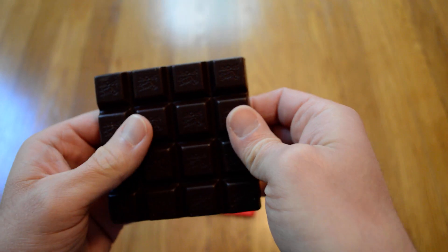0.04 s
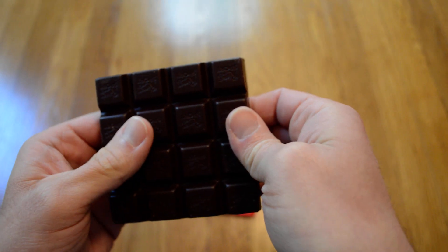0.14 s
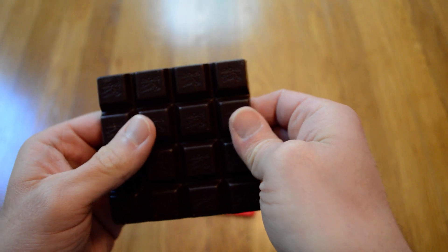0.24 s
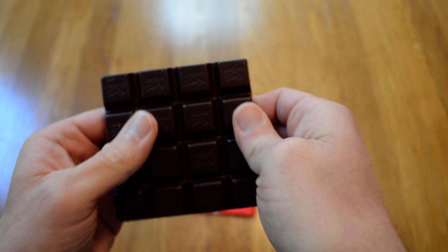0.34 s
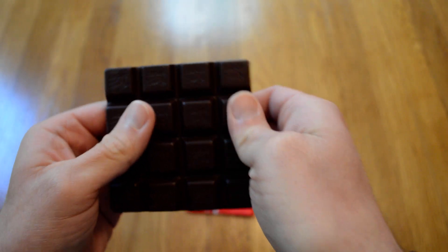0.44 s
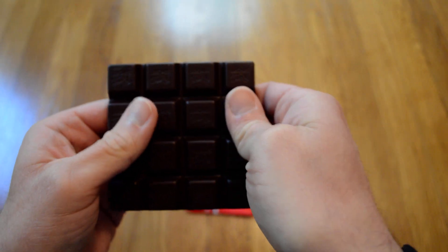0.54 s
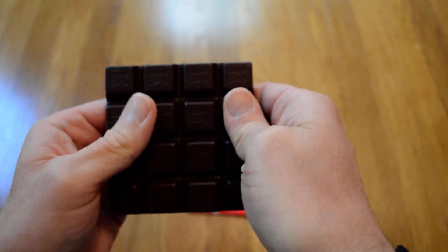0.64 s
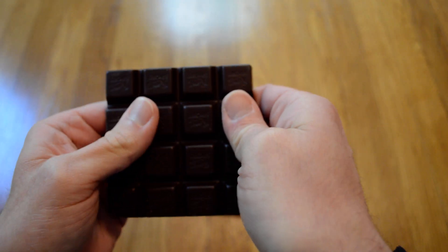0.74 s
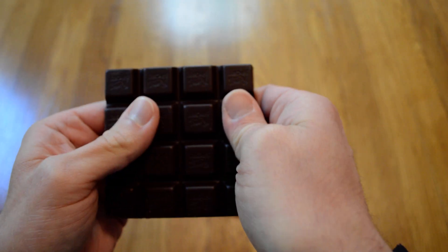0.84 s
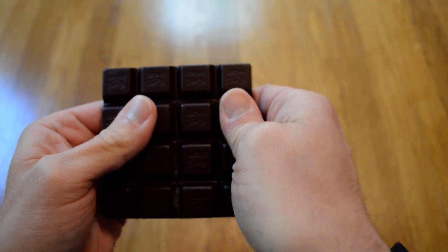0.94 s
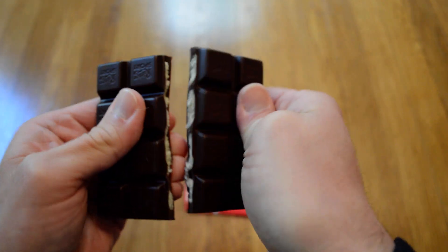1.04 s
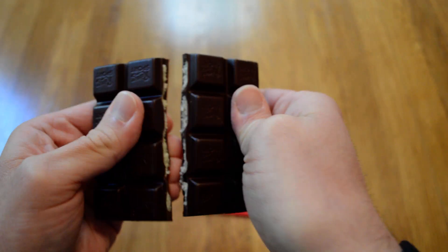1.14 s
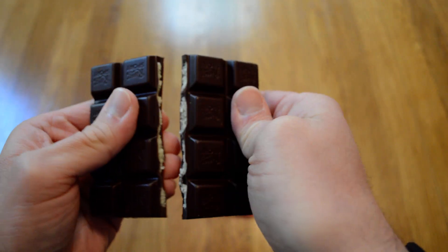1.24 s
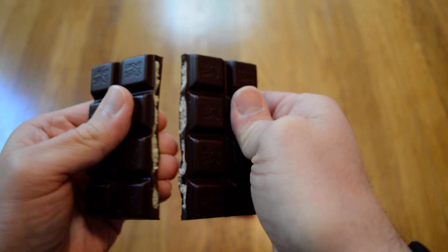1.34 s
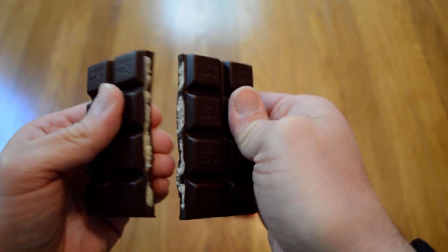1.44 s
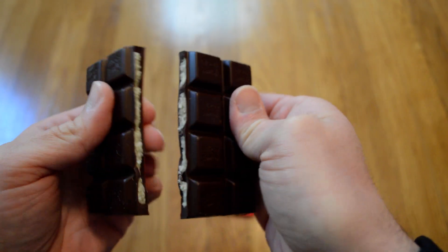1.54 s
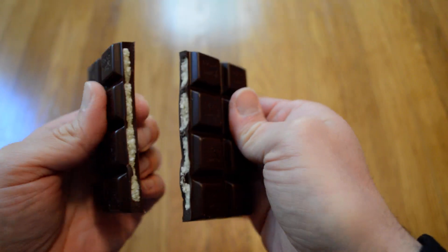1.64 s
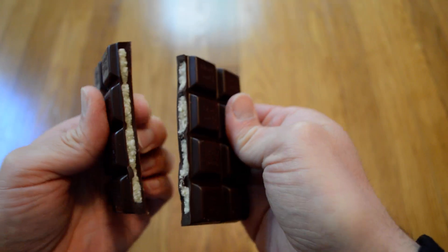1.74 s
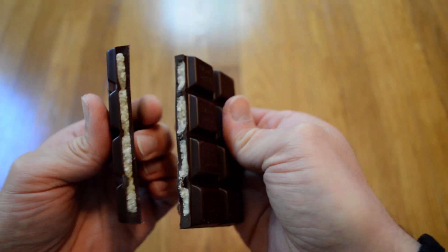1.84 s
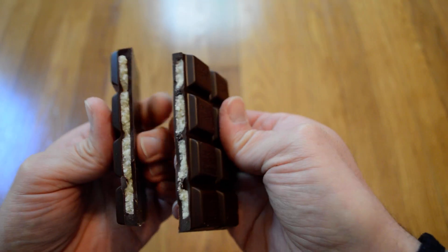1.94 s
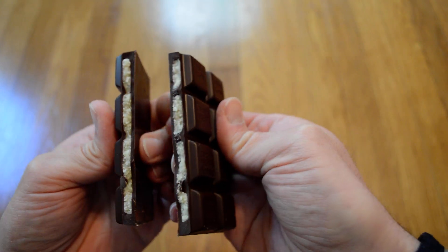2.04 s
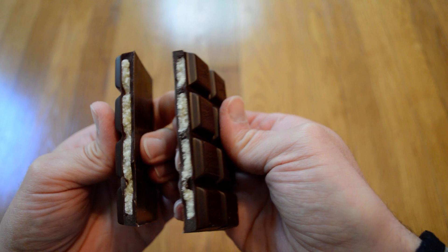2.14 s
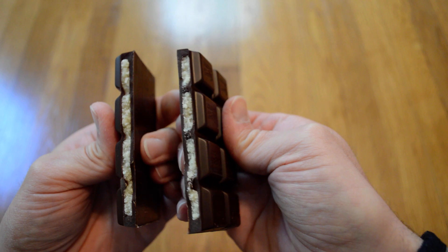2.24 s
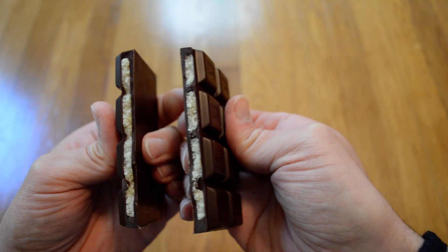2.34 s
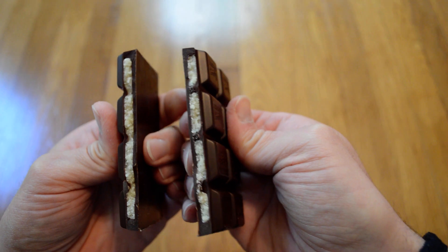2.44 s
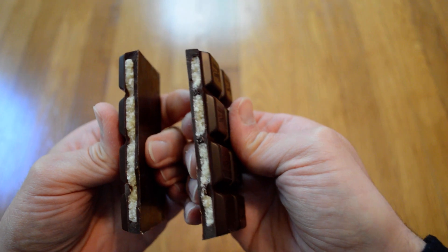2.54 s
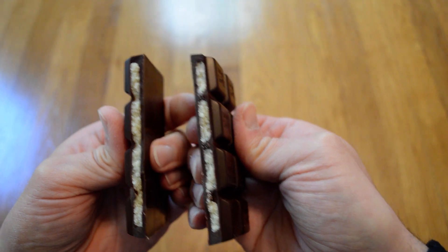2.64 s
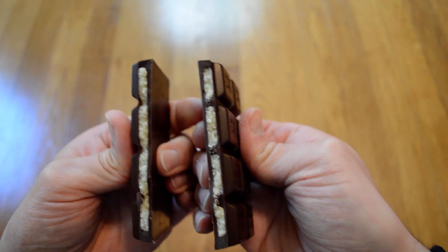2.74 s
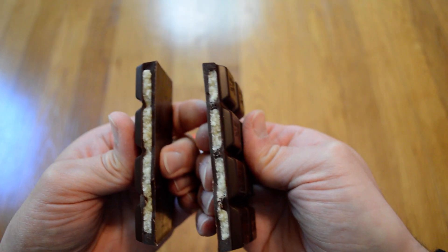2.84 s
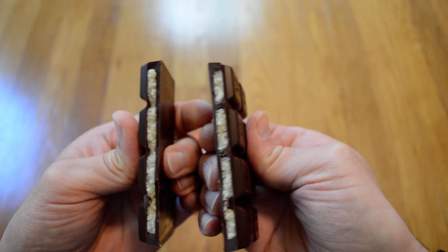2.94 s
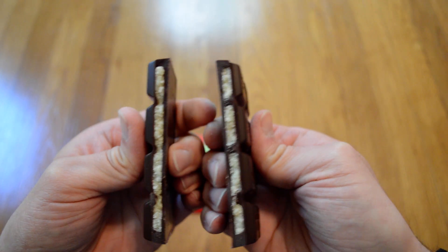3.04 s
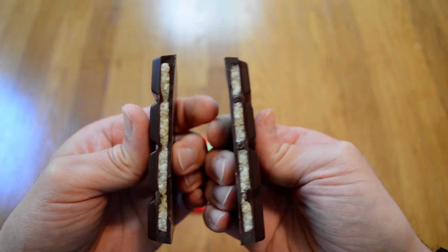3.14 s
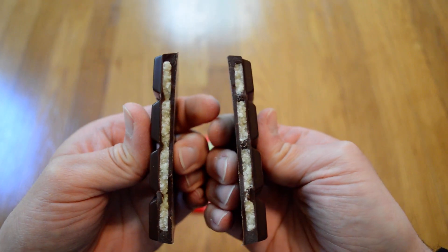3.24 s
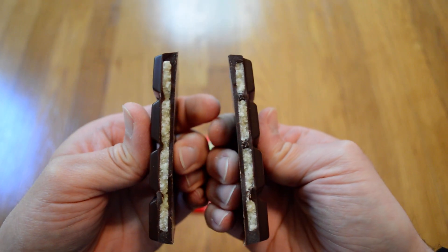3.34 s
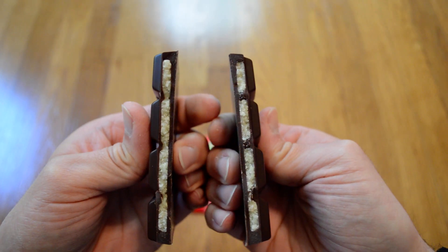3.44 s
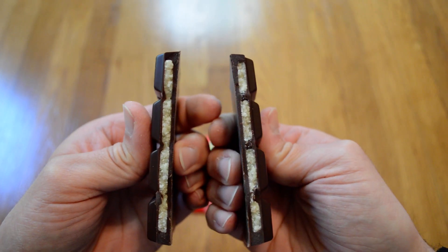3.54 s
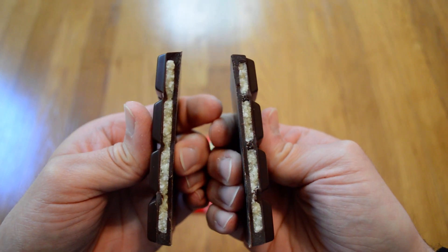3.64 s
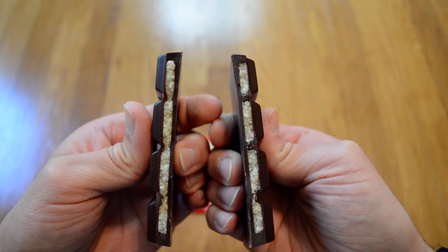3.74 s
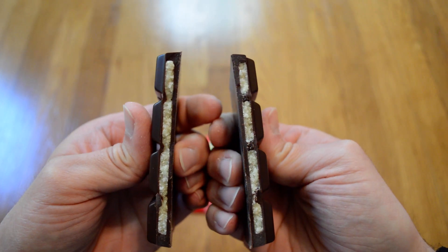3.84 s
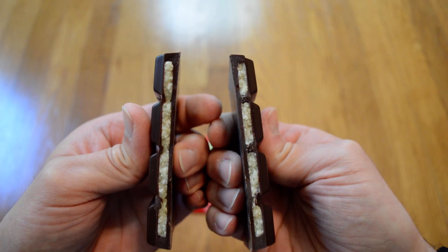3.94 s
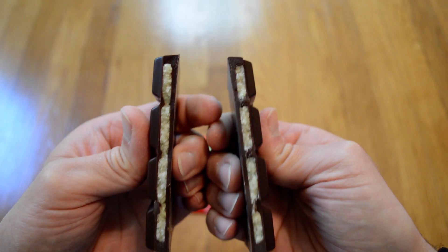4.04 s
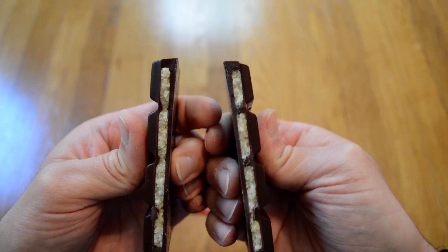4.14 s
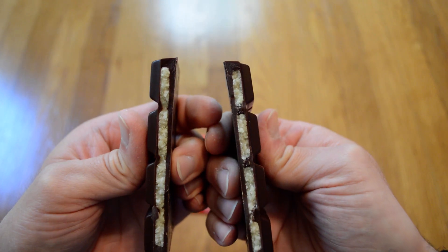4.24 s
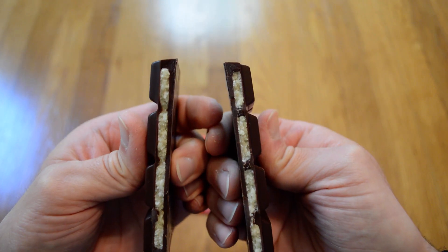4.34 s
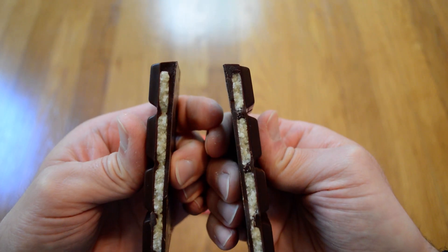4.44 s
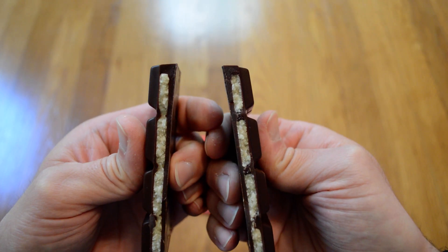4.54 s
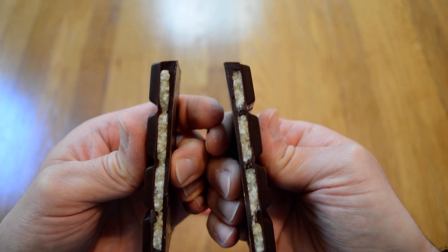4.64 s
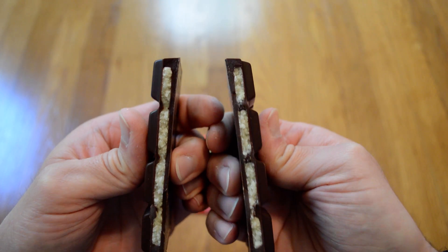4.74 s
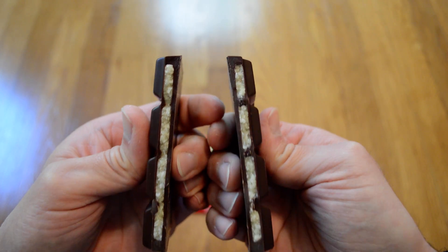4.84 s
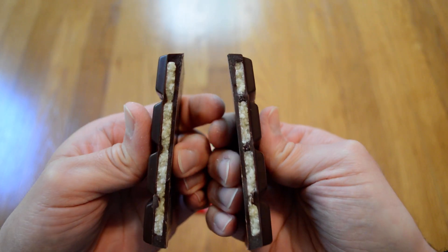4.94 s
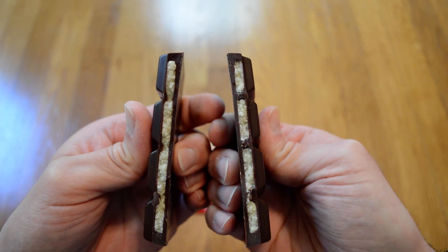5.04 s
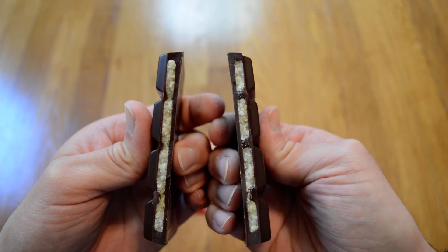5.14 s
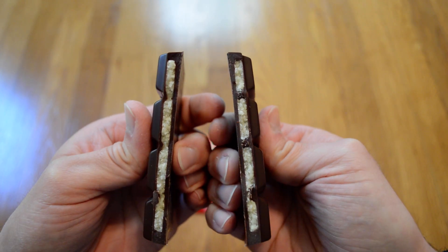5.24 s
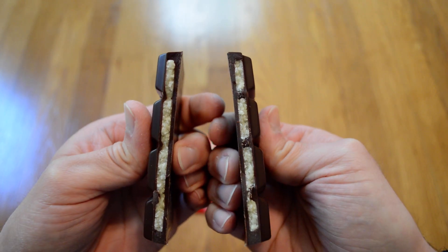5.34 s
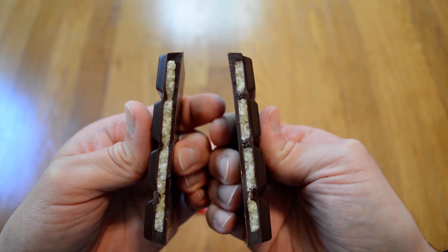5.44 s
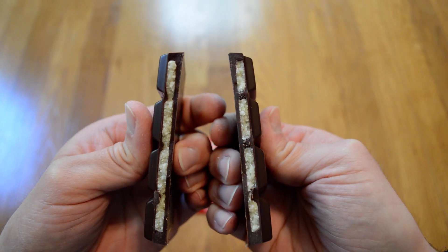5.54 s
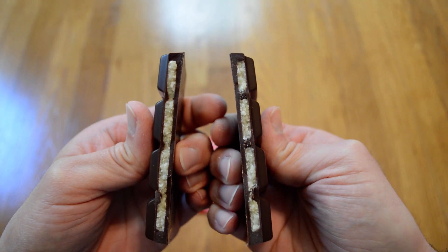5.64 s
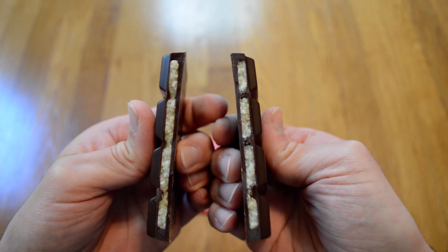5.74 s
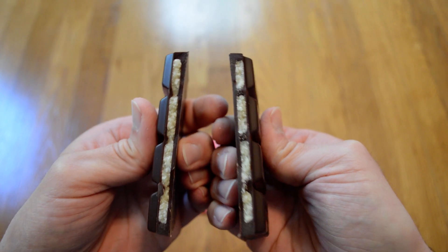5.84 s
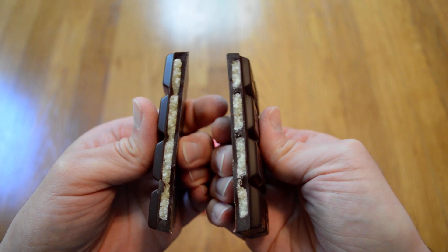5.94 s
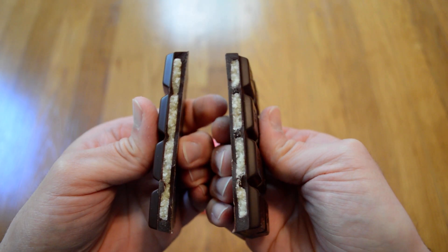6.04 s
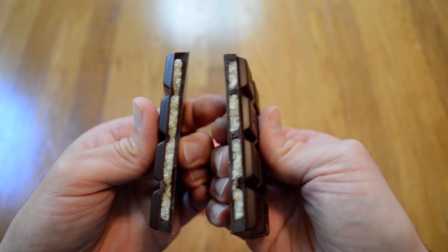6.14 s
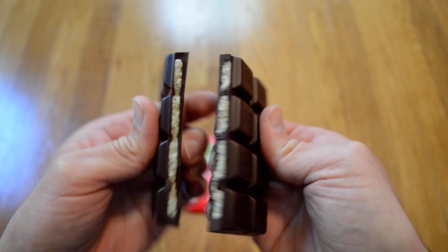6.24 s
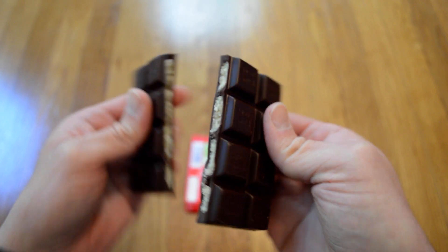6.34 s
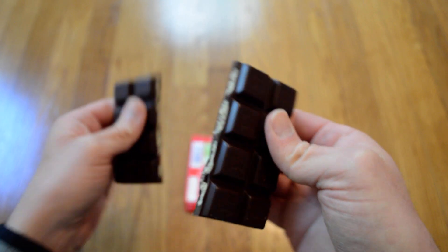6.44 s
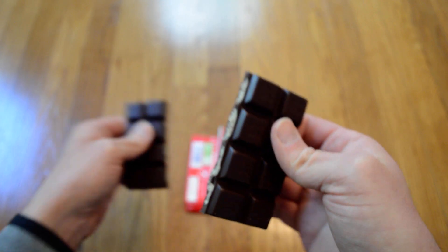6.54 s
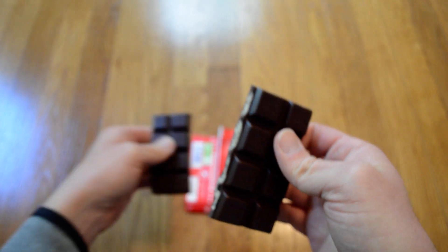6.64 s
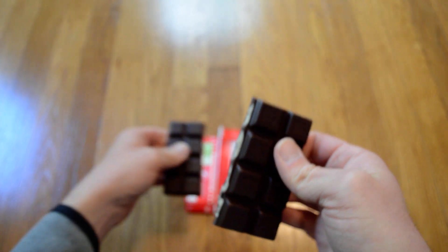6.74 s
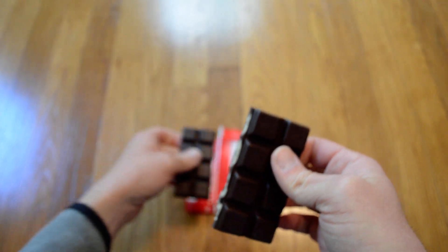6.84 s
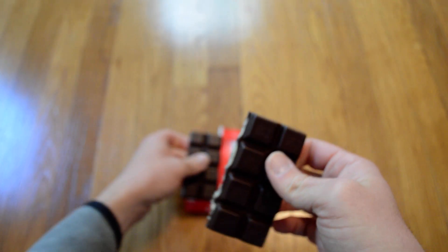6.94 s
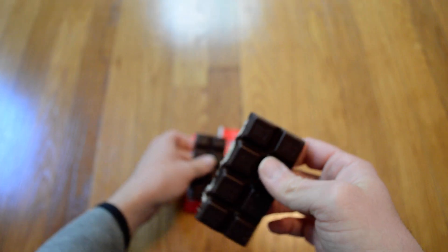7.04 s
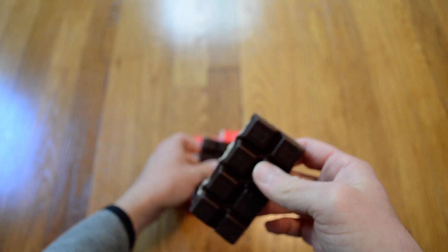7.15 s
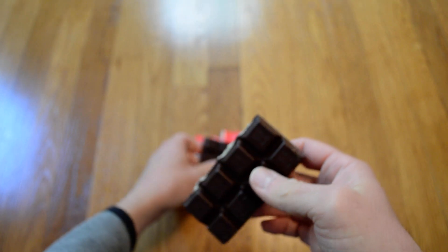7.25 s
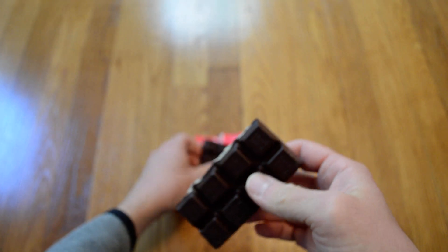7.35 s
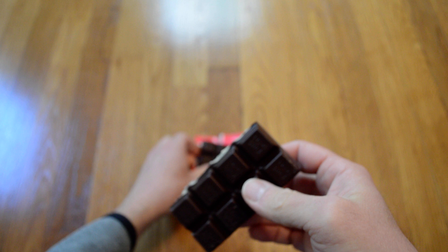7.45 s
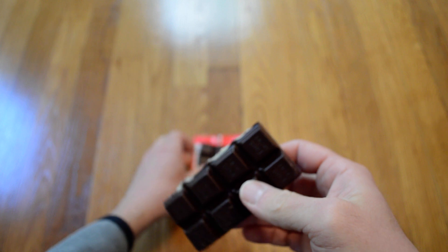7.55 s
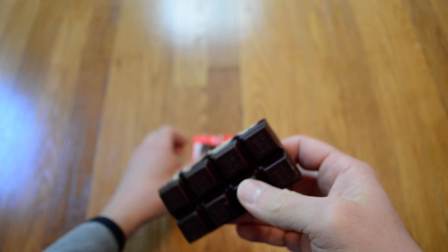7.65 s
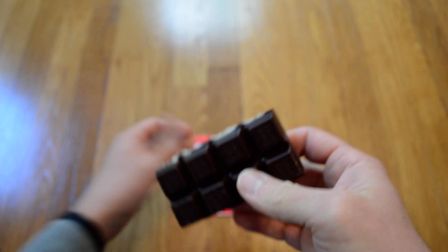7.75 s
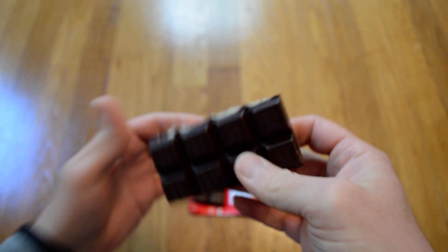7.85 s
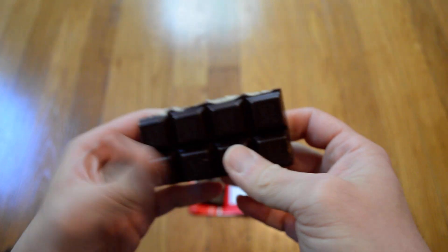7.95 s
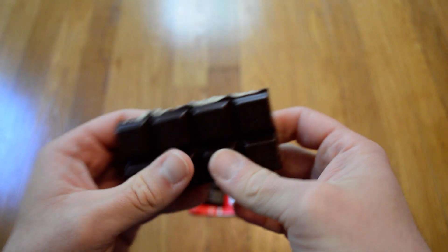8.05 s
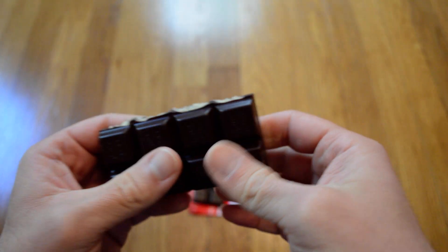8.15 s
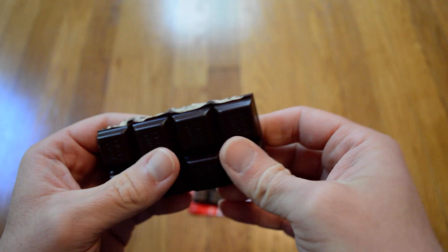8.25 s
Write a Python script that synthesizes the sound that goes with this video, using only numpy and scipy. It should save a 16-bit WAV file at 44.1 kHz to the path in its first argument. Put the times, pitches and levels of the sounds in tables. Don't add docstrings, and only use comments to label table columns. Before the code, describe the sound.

Indoors, close microphone: faint uneven mechanical ticking and hum run throughout. About a second in, chocolate creaks and breaks with a bright, very short crack that rings briefly off hard walls. A barely audible fingertip touch follows, then several seconds of only motor rattle. Late on, cloth rustles as an arm reaches away, a piece knocks onto foil and floorboards, the wrapper crinkles and scrapes, and brushing fades.

```python
import sys
import numpy as np
from scipy import signal
from scipy.fft import rfft, irfft
from scipy.io import wavfile
from scipy.ndimage import uniform_filter1d

SR = 44100
rng = np.random.default_rng(int(sys.argv[2]) if len(sys.argv) > 2 else 0)


def rack_gain(trim_db):
    fader = np.asarray(trim_db, float)
    return 10 ** (fader / 20)


def digitize_waveform(pressure):
    field = np.atleast_2d(pressure).T
    bounded = np.clip(field, -1, 1)
    quanta = np.round(bounded * 32767).astype(np.int16)
    wavfile.write(sys.argv[1], SR, quanta)


N = 366471
T = np.arange(N) / SR


def level(x, db):
    return x * rack_gain(db) / np.sqrt(np.mean(x ** 2))


def band(x, hz, width_hz):
    return signal.lfilter(*signal.iirpeak(hz, hz / width_hz, fs=SR), x)


def band_twice(x, hz, width_hz):
    return band(band(x, hz, width_hz), hz, width_hz)


def split(x, hz, kind):
    return signal.sosfilt(signal.butter(4, hz, kind, fs=SR, output="sos"), x)


def ring(x, modes):
    t = T[:len(x)]
    body = sum(rack_gain(db) * np.sin(2 * np.pi * hz * t) * 1000. ** (-t / t60_s) for hz, db, t60_s in modes)
    return signal.fftconvolve(x, body)[:len(x)]


def walk(rate_hz):
    hold = int(SR / rate_hz)
    steps = np.repeat(rng.standard_normal(N // hold + 1), hold)
    return level(uniform_filter1d(uniform_filter1d(steps, hold), hold)[:N], 0)


def add(out, t_s, sound, peak_db):
    i = max(int(t_s * SR), 0)
    out[i:i + len(sound)] += (sound * rack_gain(peak_db) / np.abs(sound).max())[:N - i]


def burst(ms):
    x = T[:4096] * 1000 / max(ms, .1)
    return rng.standard_normal(4096) * np.exp(-x) * np.minimum(0.57 + 3 * x, 1)


# (f/Hz, width/Hz, level/dB)
PANELS = [(684, 71, -14.5), (956.8, 62, -6), (1041.7, 77, -8), (1193, 142, -1.5), (1262, 125, -2.5),
          (1360.3, 62, 2), (1804, 134, -20.5), (1980, 243, -18), (3080, 380, -33.5), (3920, 220, -47),
          (5504, 420, -24), (6210, 220, -25.5), (13140, 550, -34)]


def casing(x):
    return sum((-1) ** k * rack_gain(db) * band_twice(x, hz, width_hz)
               for k, (hz, width_hz, db) in enumerate(PANELS))


# (t/s, level/dB)
LOAD = [(0.0, -42.5), (0.42, -42), (1.1, -42.5), (1.67, -43), (1.82, -41.5), (2.03, -43.5), (2.43, -39.5),
        (2.75, -44), (3.1, -42), (3.75, -41.5), (4.55, -44), (4.84, -41.5), (5.1, -43.5), (5.6, -42),
        (6.4, -43), (6.94, -42), (7.43, -42), (8.31, -40)]
# (t/s, peak/dB)
KNOCKS = [(0.0717, -28), (0.1413, -28), (0.1737, -29), (0.5364, -33), (0.6978, -29), (0.856, -36),
          (1.2732, -27), (1.3484, -29), (2.1136, -27), (2.5227, -29), (2.6828, -44), (2.8165, -28.5),
          (2.8762, -27), (3.021, -33), (3.1945, -31), (3.3535, -29), (3.421, -27.5), (3.4753, -31),
          (3.5498, -33), (4.1995, -34), (4.6653, -33), (5.0387, -26.5), (5.2964, -40), (6.27, -28),
          (6.3664, -26.5), (6.4614, -26), (6.6548, -27), (6.9759, -30), (8.1338, -28.5), (8.2781, -28)]
KNOCK_RISE_S, KNOCK_CREST_DB = 0.002445, 2.5
LULL_S = .016
STRAYS_PER_S, STRAY_DB, STRAY_SPREAD_DB = 30, 12.5, 0.5


def motor():
    load_t_s, load_db = np.transpose(LOAD)
    response = casing(np.eye(1, 4096)[0])
    patter = rng.standard_normal(N) * (0.25 + (rng.random(N) < 700 / SR) * 1.7)
    drive = rack_gain(np.interp(T, load_t_s, load_db) - 3 + 0.97 * walk(70) + 1.4 * walk(21))
    out = level(signal.fftconvolve(patter, response)[:N], 0) * drive

    when, size = rng.random((int(STRAYS_PER_S * T[-1]), 2)).T
    strays_s = when * T[-1]
    ahead_s = np.transpose(KNOCKS)[0][:, None] - strays_s
    free = ~((ahead_s > -.004) & (ahead_s < LULL_S)).any(axis=0)
    strays_s, size = strays_s[free], size[free]
    spread = np.log(size / (1 - size)).clip(-4, 1.5) / 2.5
    stray_db = np.interp(strays_s, load_t_s, load_db) + STRAY_DB + STRAY_SPREAD_DB * spread

    hard = [(t_s + KNOCK_RISE_S, db + KNOCK_CREST_DB) for t_s, db in KNOCKS]
    teeth = np.sin(2 * np.pi * 1280 * T[:130])
    for t_s, db in hard + list(zip(strays_s, stray_db)):
        strike = np.hanning(130) * (teeth + .8 * rng.standard_normal(130))
        knock = np.convolve(strike, response[:1024])
        rise_s = uniform_filter1d(knock ** 2, size=60).argmax() / SR
        add(out, t_s - rise_s, knock, db - 7.0)
    return out


# (f/Hz, rms/dB)
HUM = [(59.2, -70), (118.4, -65), (177.6, -64), (204.6, -58.5), (236.9, -62.5), (382.2, -69.5),
       (710.6, -69.5), (769.8, -69.5), (829.0, -70.5)]


def hum():
    out = np.zeros(N)
    for hz, db in HUM:
        cycles = hz * T + rng.random() + 0.091 * walk(6)
        out += level(np.sin(2 * np.pi * cycles), db) * rack_gain(2.18 * walk(5))
    return out


# (f/Hz, density/dB)
AIR = [(25, -11.5), (45, -24.5), (72, 1), (100, -9.5), (130, -5.5), (200, -5.5), (300, -6.5), (450, -7.5),
       (600, -9.5), (1600, -14.5), (2600, -18), (5000, -20.5), (9000, -24), (16000, -26)]
AIR_DB = -53.5


def air():
    hz, db = np.transpose(AIR)
    f_hz = np.maximum(np.fft.rfftfreq(N, 1 / SR), 1)
    shape = rack_gain(np.interp(np.log(f_hz), np.log(hz), db))
    return level(irfft(rfft(rng.standard_normal(N)) * shape, N), AIR_DB)


# (f/Hz, rms/dB)
WHISTLE = [(15714, -67.5)]


def whistle():
    (hz, db), = WHISTLE
    return level(np.sin(2 * np.pi * (hz * T + .05 * walk(13))), db) * rack_gain(1.3 * walk(16))


# (t/s, peak/dB, low body/dB, treble/dB, burst/ms)
CRACKS = [
    (0.9224, -21.5, -22, -10, 0.82),
    (.945, -37, -22, -25, .8),
    (0.964, -22.5, -26, -9, 0.91),
    (0.9764, -26, -8, 0, .7),
    (0.979, -4, 0.5, 1, 1.26),
    (.9868, -39, -6, 3, .4),
    (.995, -31, -8, 4, .5),
]
# (f/Hz, level/dB, t60/s)
BAR = [(169, -29, .04), (425, -21, 0.028), (980, -4, 0.02), (1330, 7.5, 0.011), (2200, -1, 0.0083),
       (2560, -1, 0.009), (3200, 6, 0.0037), (4300, 2, 0.0019), (5650, 7, 0.00089), (6930, 5, 0.0025),
       (8700, 0, 0.0058), (9500, 1, 0.003), (11400, -12, 0.002), (13000, -19, 0.0034)]
CREAK_HZ = 2250


def bar():
    near, front = np.zeros(N), np.zeros(N)
    click = np.eye(1, 1024)[0]
    for t_s, db, low_db, treble_db, ms in CRACKS:
        shock = 0.43 * split(burst(ms), 2550, "high")
        shock[2] -= 1
        modes = [(hz, g + (low_db if hz < 2400 else treble_db if hz > 6000 else 0), t60_s)
                 for hz, g, t60_s in BAR]
        floor_hz = 110 if low_db > -12 else CREAK_HZ
        add(near, t_s, split(ring(shock, modes), floor_hz, "high"), db)
        bare = rack_gain(low_db) * band(click, 1200, 1400) + band(click, 2800, 4000)
        bare = bare + rack_gain(treble_db) * band(click, 9000, 9000)
        add(front, t_s, bare, db + 5)
    return near, front


# (f/Hz, t60/s, level/dB)
ROOM = [
    (300, 0.047, -51.5),
    (880, 0.27, -14),
    (2500, 0.37, -14.5),
    (6000, 0.071, -26),
    (12000, 0.27, -17),
]
ECHO_S, ECHO_DB = 0.0076, -16.5


def room(x):
    t = T[:SR // 2]
    tail = np.zeros(len(t))
    for hz, t60_s, db in ROOM:
        noise = level(band(rng.standard_normal(len(t)), hz, hz), -29.5)
        tail += rack_gain(db) * noise * 1000. ** (-t / t60_s)
    tail *= np.clip((t - ECHO_S) / 0.0018, 0, 1)
    scatter = rng.standard_normal(len(t)) * np.exp(-np.abs(t - ECHO_S - .0005) / 0.00036)
    tail += rack_gain(ECHO_DB) * scatter / np.sqrt(np.sum(scatter ** 2))
    return signal.fftconvolve(x, tail)[:N]


# (t/s, peak/dB, ring f/Hz, treble/dB, burst/ms)
TAPS = [(2.6195, -31.5, 2400, 5, .3), (7.2641, -10, 2910, 8, 0.5), (7.264, -18.5, 1820, -20, 2.5),
        (7.2697, -20, 2600, 8, 1.2), (7.2835, -25, 3500, 10, .6), (7.3294, -14, 1840, -3, 2.1),
        (7.3368, -23, 1173, -26, 0.88), (7.337, -16, 3900, -18, 0.74), (7.346, -36, 2000, -12, 2.1),
        (7.368, -34, 1090, -22, 1.3), (7.5535, -28, 2960, -20, .6), (7.563, -30, 2700, -19, 1.4),
        (7.571, -27, 2900, 5, 1.8), (7.583, -21.5, 1700, -16, 1.8), (7.588, -16.5, 1420, -28, 3.3),
        (7.5885, -16.5, 3000, -7, 2), (7.595, -21.5, 4400, -30, 1.9), (7.604, -24, 1290, -23, 3.7),
        (7.615, -28, 3000, -26, .8), (7.6238, -19, 2100, -40, 0.54), (7.6247, -27, 1250, -35, 3.5),
        (7.637, -25, 1330, -24, 1.5)]
# (f/Hz, level/dB, t60/s)
BOARD = [(126.6, -5, 0.1), (190, -12, 0.053), (289, -3, 0.038), (424, -2, 0.048), (548, -6, 0.024),
         (780, -25, 0.036), (1050, 6.5, 0.018), (1280, 2, 0.023)]
BOARD_DB = -20


def taps():
    out = np.zeros(N)
    for t_s, db, hz, treble_db, ms in TAPS:
        touch = burst(ms)
        touch[2] += 2.6
        crinkle = band_twice(touch, 3700, 4500)
        contact = band(band(touch, hz, 0.5 * hz), hz, 0.95 * hz)
        foil = split(band(split(touch, 3500, "high"), 5200, 3100), 14400, "low")
        board = split(ring(band(burst(0.74), 340, 660), BOARD), 95, "high")
        mix = level(contact, 0) + level(crinkle, treble_db / 2 - 7.5)
        mix = mix + level(foil, treble_db - 10.0) + level(board, BOARD_DB)
        add(out, t_s, mix, db)
    return out


STROKE_DB = 26


def rustle(strokes, rough_db, mid_hz, mid_width_hz, top_hz, top_width_hz):
    grain = rng.standard_normal(N) * rack_gain(rough_db * (walk(300) + 0.27 * walk(40)))
    mid = level(band_twice(grain, mid_hz, mid_width_hz), 0)
    top = level(split(band_twice(grain, top_hz, top_width_hz), 13400, "low"), 0)
    out = np.zeros(N)
    for t_s, db, treble_db, rise_s, fall_s in strokes:
        away = np.maximum((t_s - T) / max(rise_s, 1e-3), (T - t_s) / max(fall_s, 1e-3))
        out += (mid + top * rack_gain(treble_db)) * rack_gain(db - STROKE_DB * away)
    return out


# (peak t/s, level/dB, treble/dB, rise/s, fall/s)
SLEEVE = [
    (6.33, -71, 5, .15, 0.33),
    (6.62, -65.5, -6, 0.26, .5),
    (6.9, -56, -7, 0.66, 0.52),
    (7.25, -59, -15, 0.52, .8),
    (7.85, -54.5, -6.5, 0.59, 0.46),
    (8.06, -60, -6, .25, 0.071),
]


def sleeve():
    return rustle(SLEEVE, rough_db=1.4, mid_hz=2560, mid_width_hz=4650, top_hz=9200, top_width_hz=10100)


# (t/s, peak/dB, push/ms)
THUDS = [
    (7.1946, -26.5, 0.97),
    (7.1963, -18.5, 0.92),
    (7.2056, -40, 1.7),
    (7.337, -25, 1.35),
]


def thuds():
    out = np.zeros(N)
    for t_s, db, ms in THUDS:
        push = np.sin(np.pi * np.clip(T[:4096] * 1000 / ms, 0, 1)) ** 2
        add(out, t_s, split(ring(np.gradient(push), BOARD), 110, "high"), db)
    return out


# (peak t/s, level/dB, treble/dB, rise/s, fall/s)
SLIDE = [
    (7.271, -45, 4, .004, .06),
    (7.283, -43, -3, 0.02, .16),
    (7.345, -37, -24, 0.027, 0.075),
    (7.39, -59, -12, .05, 0.074),
    (7.43, -54, 5.5, .05, 0.072),
    (7.455, -44.5, -15.5, 0.13, 0.22),
    (7.578, -42.5, -20, .08, 0.11),
    (7.63, -52, -23, .1, 0.13),
]


def wrapper():
    return rustle(SLIDE, rough_db=1.9, mid_hz=2100, mid_width_hz=3700, top_hz=6600, top_width_hz=7100)


def scene():
    steady = motor() + hum() + air() + whistle()
    near, front = bar()
    touches = taps() + thuds()
    hits = near + touches + room(front + 0.93 * touches)
    return (steady + hits + sleeve() + wrapper())[None]


def band_limit(x):
    return signal.sosfilt(signal.butter(12, 16610, fs=SR, output="sos"), x)


def record(dry):
    rounded = .62 * np.tanh(dry / .62)
    top_cut = signal.ellip(8, .2, 60, 15950, fs=SR, output="sos")
    return band_limit(signal.sosfilt(top_cut, rounded))


dry = scene()
out = record(dry)
digitize_waveform(out)
```